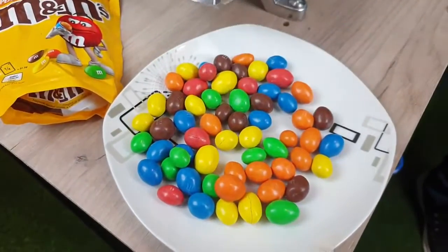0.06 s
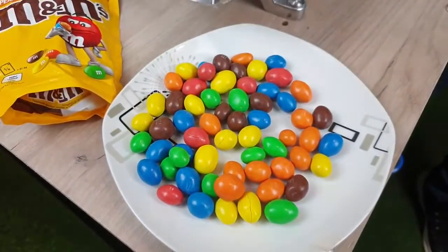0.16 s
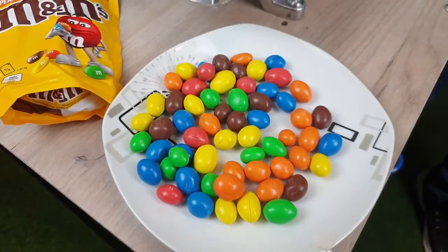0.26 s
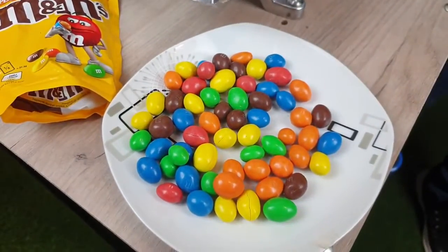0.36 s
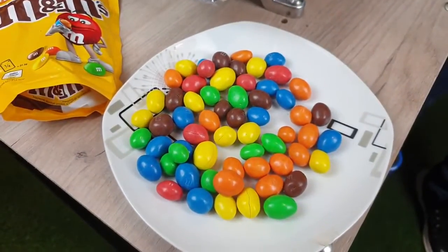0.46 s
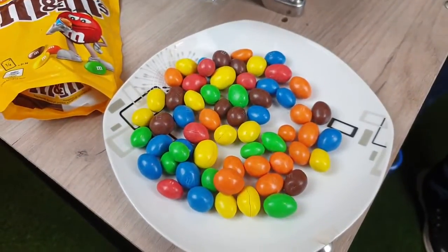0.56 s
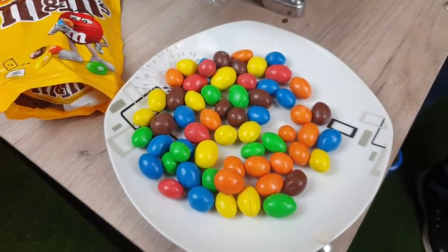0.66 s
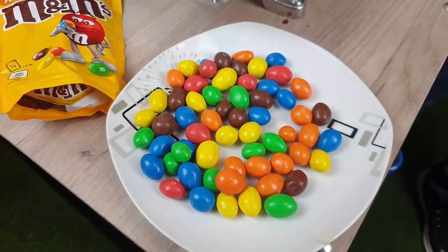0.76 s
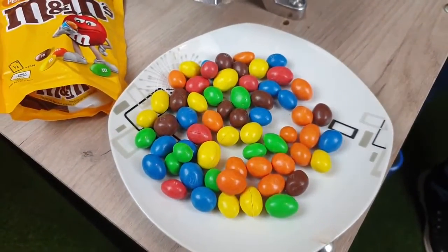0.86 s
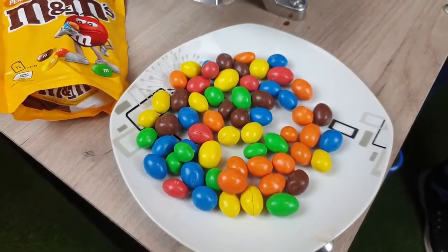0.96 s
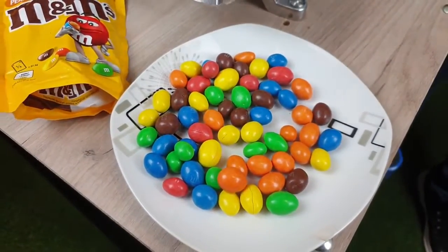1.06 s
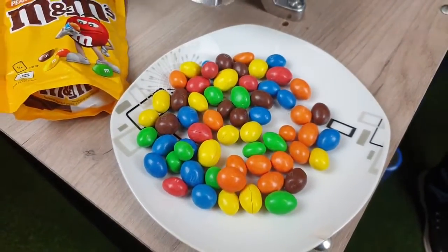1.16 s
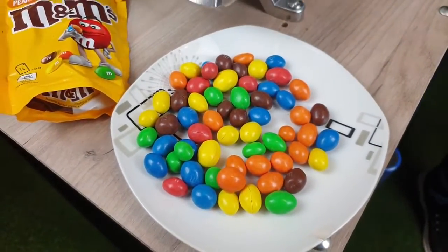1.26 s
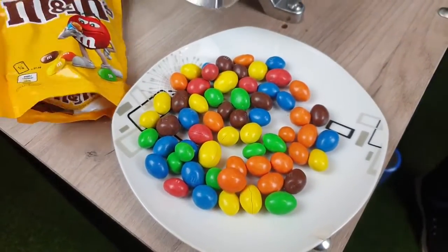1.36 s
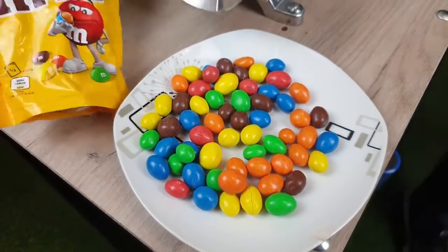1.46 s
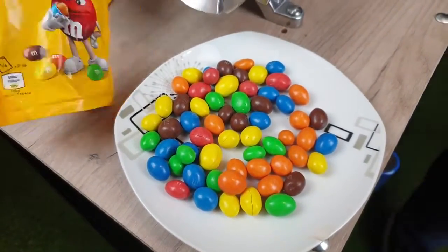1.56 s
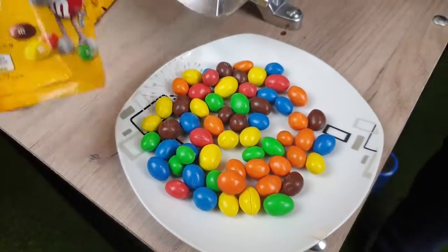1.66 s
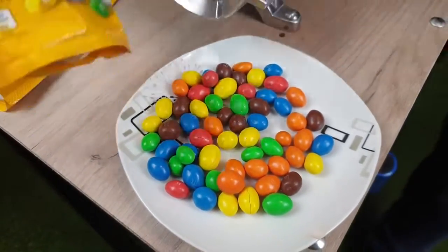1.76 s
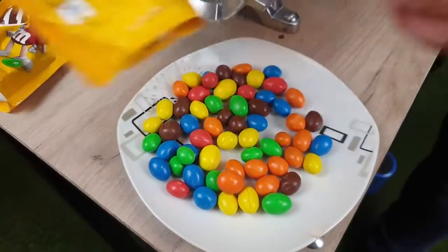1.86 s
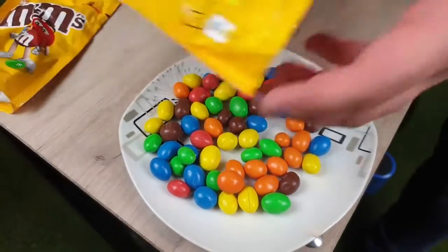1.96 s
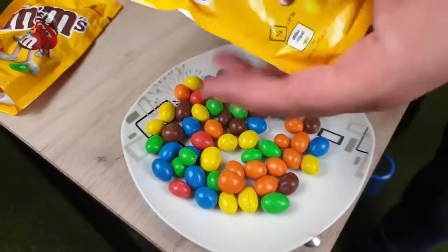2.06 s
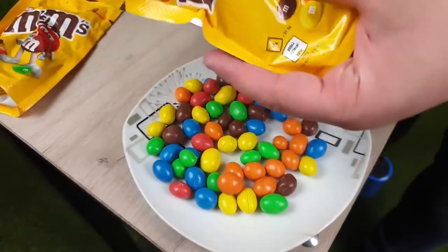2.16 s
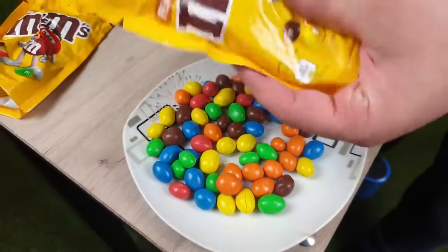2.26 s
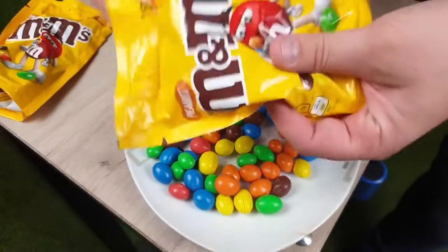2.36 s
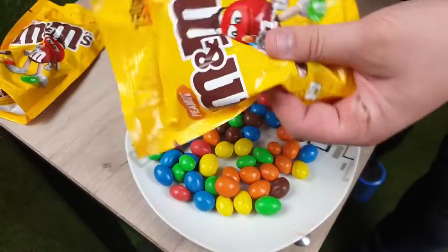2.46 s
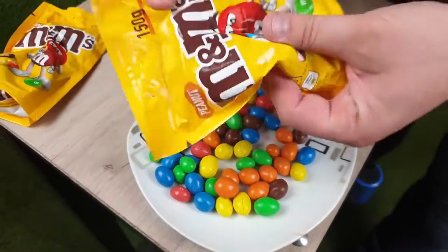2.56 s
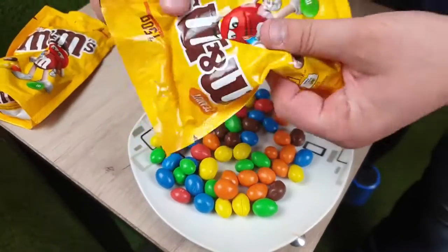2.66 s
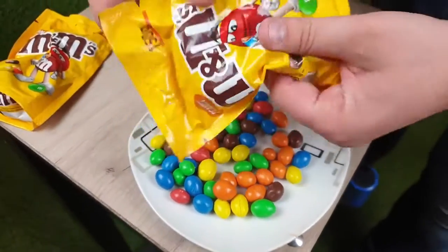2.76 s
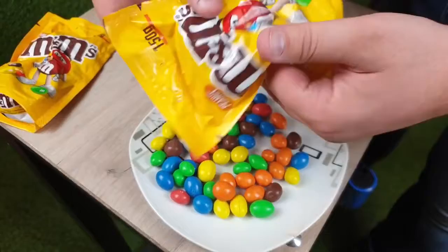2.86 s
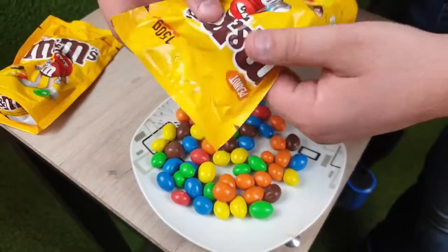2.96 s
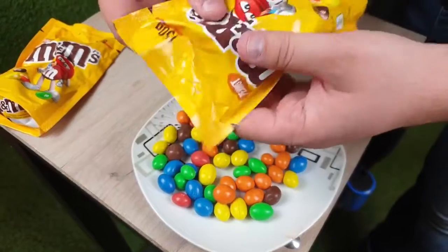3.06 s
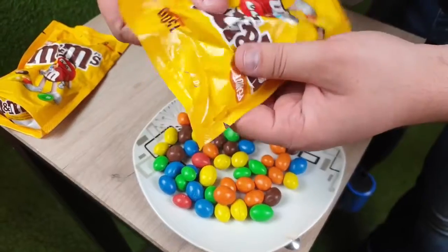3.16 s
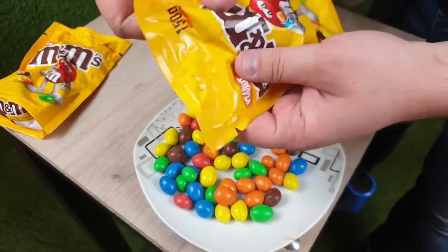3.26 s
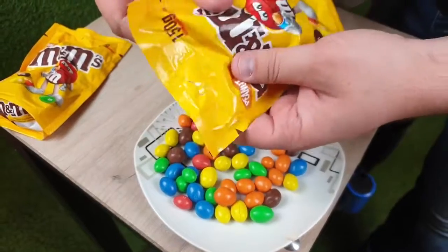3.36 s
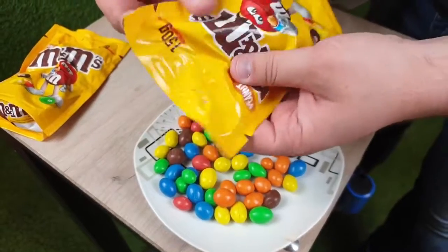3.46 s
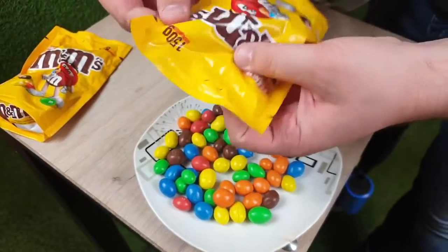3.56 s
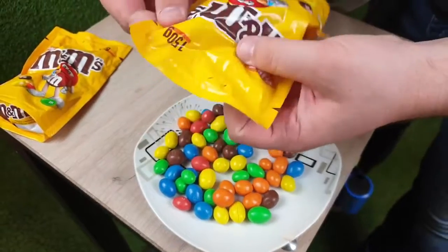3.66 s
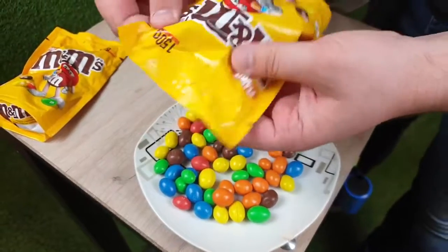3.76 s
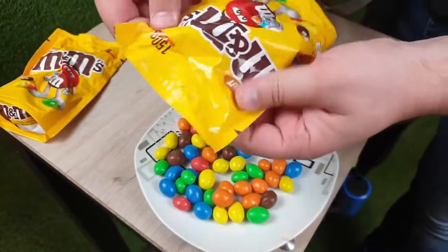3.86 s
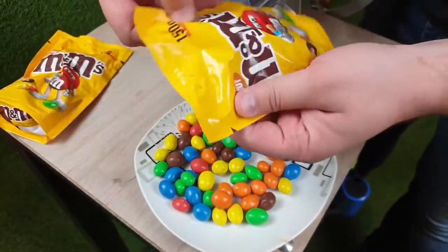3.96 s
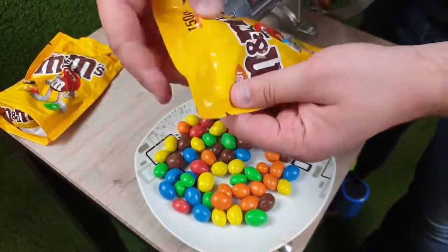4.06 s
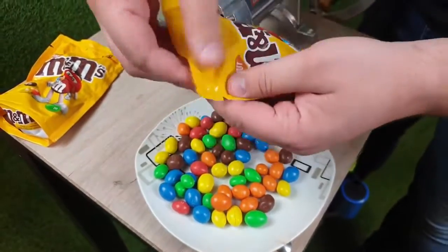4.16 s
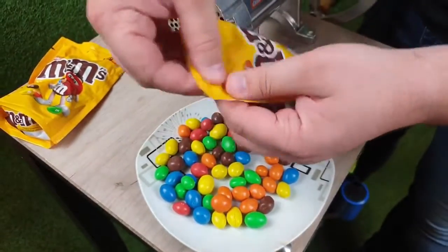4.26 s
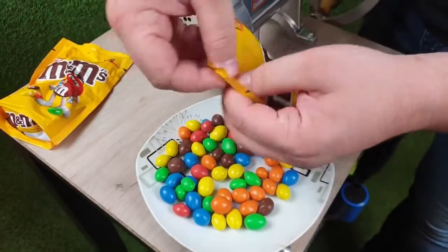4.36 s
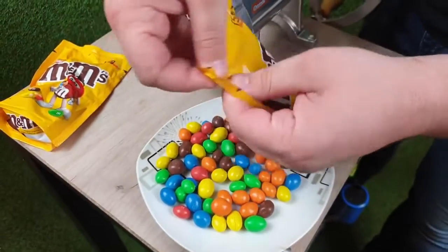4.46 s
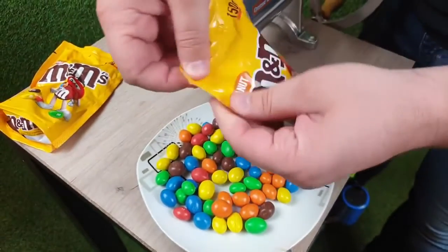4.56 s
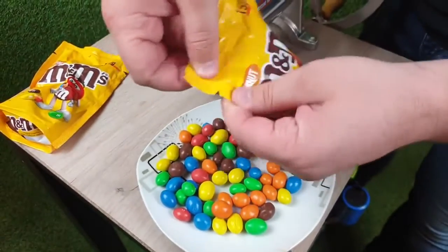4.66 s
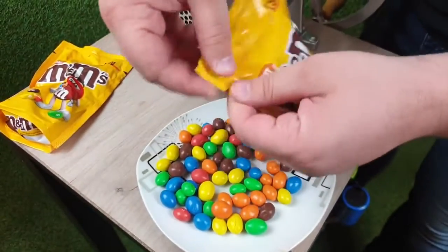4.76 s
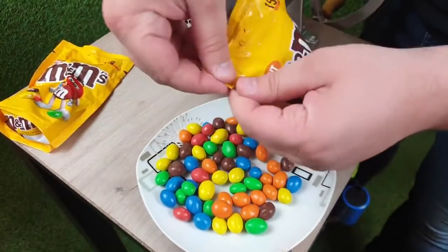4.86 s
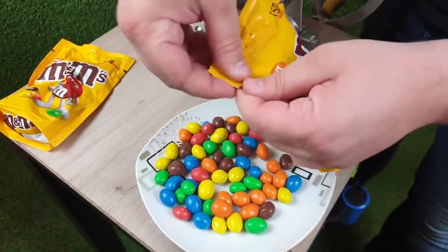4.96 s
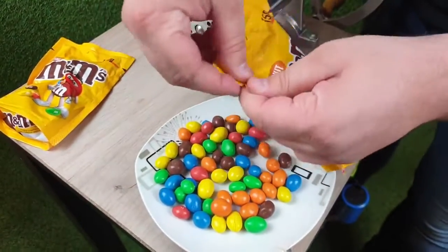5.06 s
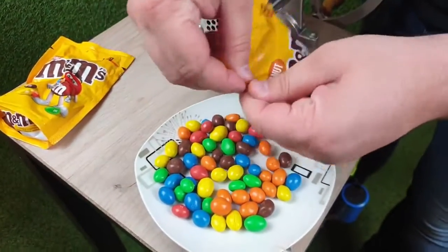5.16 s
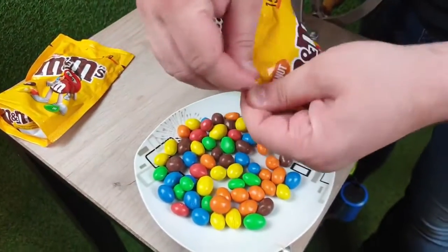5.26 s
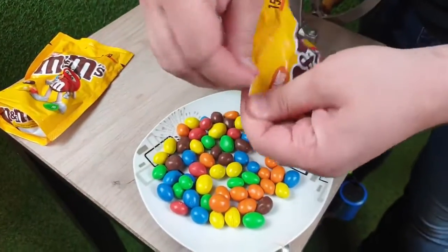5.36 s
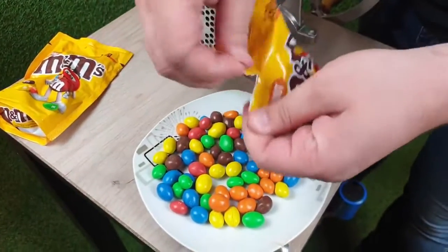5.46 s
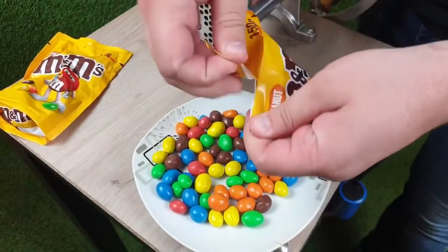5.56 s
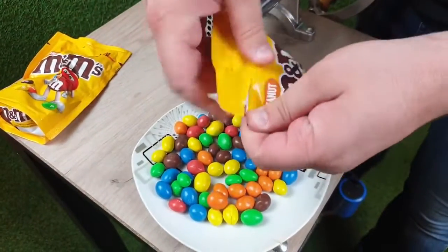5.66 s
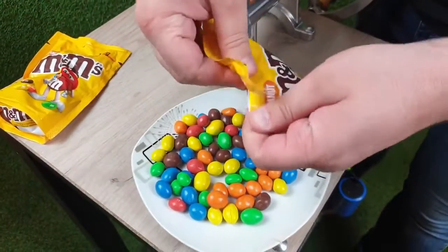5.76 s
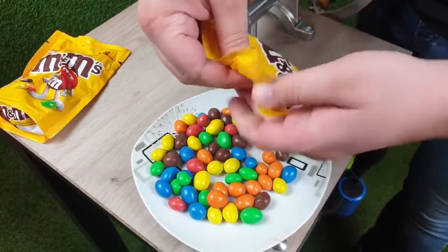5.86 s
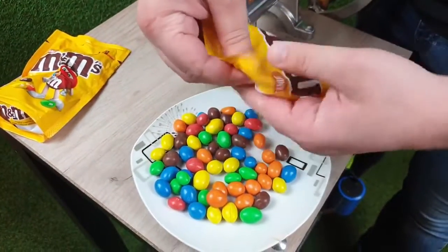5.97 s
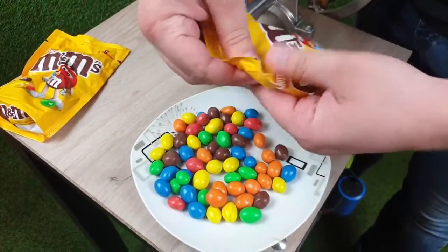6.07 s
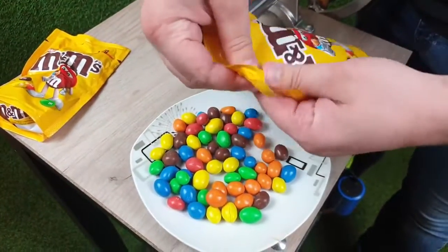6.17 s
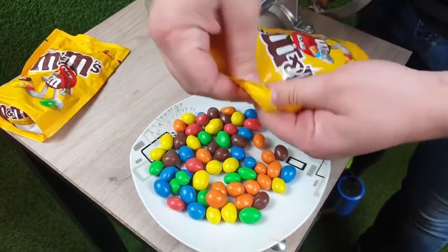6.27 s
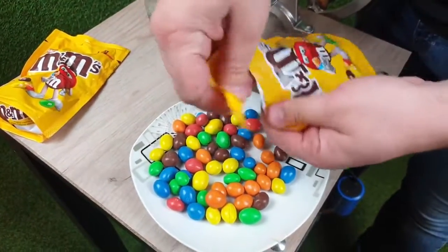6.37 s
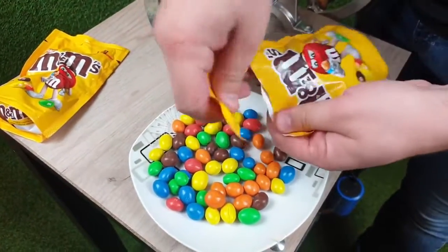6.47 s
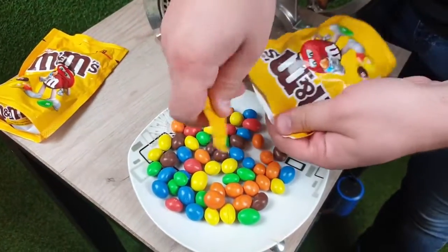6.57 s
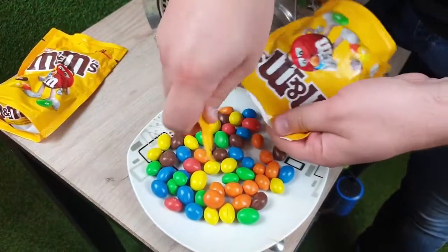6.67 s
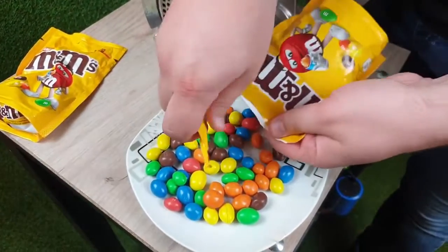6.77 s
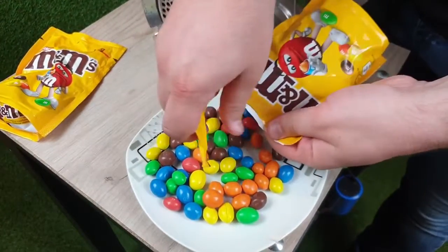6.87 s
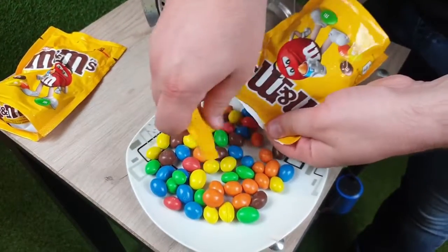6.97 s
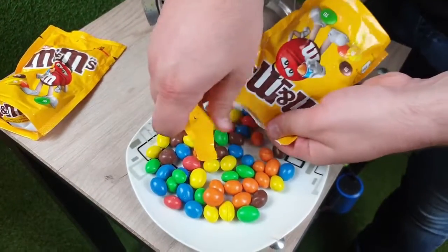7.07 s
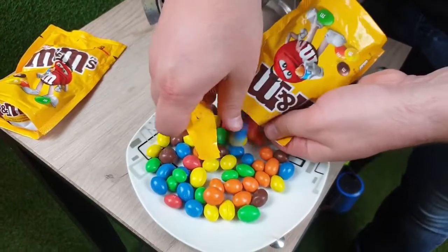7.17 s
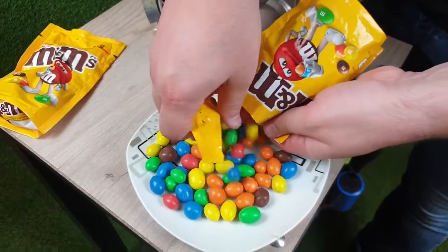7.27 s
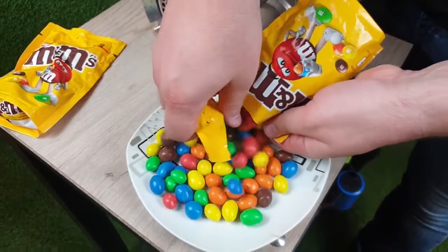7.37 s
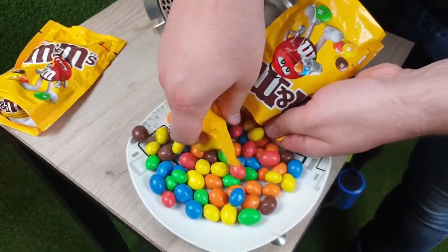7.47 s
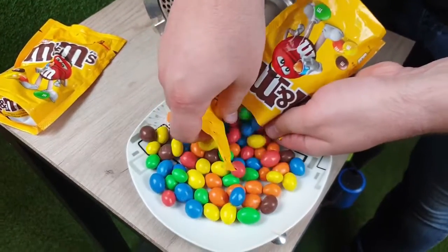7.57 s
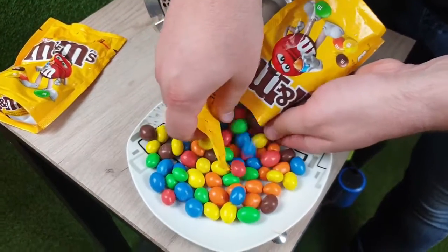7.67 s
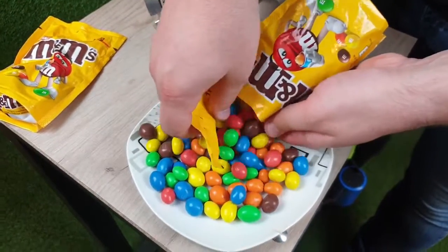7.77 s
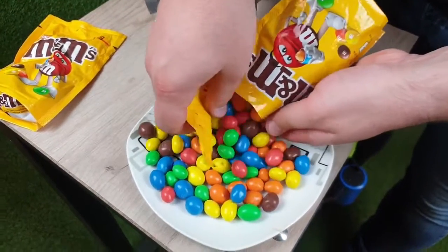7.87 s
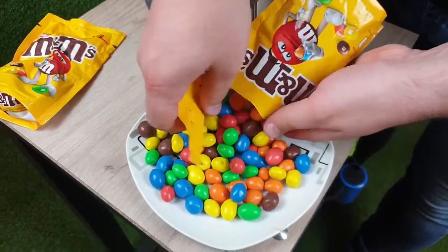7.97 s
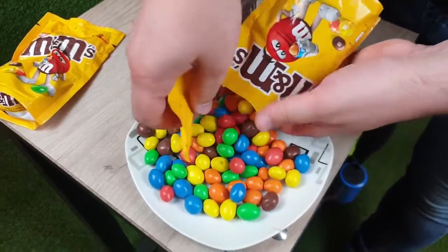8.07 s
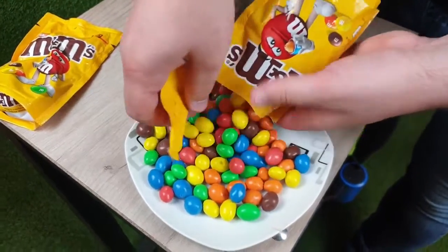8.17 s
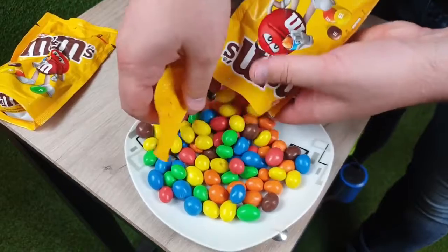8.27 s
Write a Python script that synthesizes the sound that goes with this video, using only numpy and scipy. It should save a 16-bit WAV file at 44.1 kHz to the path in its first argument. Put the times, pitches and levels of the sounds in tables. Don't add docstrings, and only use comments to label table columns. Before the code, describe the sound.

In a quiet room with a faint far motor hum, a plastic bag barely shifts, then is lifted with loud, sharp crinkling while candies knock dully inside. It is turned over and torn with uneven crackles. A short, dense pour of hard candies clicks and rings on a china plate, thinning quickly to soft film rustle. Close stereo microphone, sources slightly left, little reverberation.

```python
import sys
import numpy as np
from scipy import signal
from scipy.fft import rfft, irfft, next_fast_len
from scipy.io import wavfile
from scipy.ndimage import uniform_filter1d, map_coordinates

SR = 44100
rng = np.random.default_rng(int(sys.argv[2]) if len(sys.argv) > 2 else 0)


def invert_db(level):
    return 10 ** (np.asarray(level, dtype=float) / 20)


def put_to_file(sound):
    columns = np.atleast_2d(sound).T
    safe = np.clip(columns, -1, 1)
    whole_steps = np.round(safe * 32767)
    wavfile.write(sys.argv[1], SR, whole_steps.astype(np.int16))


N = 366471
LIFT_S = 1.33
TABLE_SIDE = invert_db([[2.5], [-2.5]])


def along(points, hz):
    f, v = np.transpose(points)
    return np.interp(np.log(hz + 1), np.log(f + 1), v)


def curve(rows, col=1, at=None):
    rows = np.asarray(rows)
    times = np.arange(N) / SR if at is None else at
    return np.interp(times, rows[:, 0], rows[:, col], -140, -140)


def wobble(rate):
    knots = rng.standard_normal(int(N * rate / SR) + 4)
    return map_coordinates(knots, [np.arange(N) * rate / SR])


def filtered(x, response):
    m = next_fast_len(N + SR // 2)
    return irfft(rfft(x, m) * response(np.fft.rfftfreq(m, 1 / SR)), m)[..., :N]


def hiss(spectrum, alike=0):
    a, b = rng.standard_normal((2, N))
    right = alike * np.roll(a, 4) + np.sqrt(1 - alike ** 2) * b
    x = filtered(np.array([a, right]), lambda hz: invert_db(along(spectrum, hz)))
    return x / x.std()


def swells(rows, col, roundness):
    rows, t = np.asarray(rows), np.arange(0, N + 64, 64) / SR
    late = t - rows[:, :1]
    away = np.abs(late) / np.where(late < 0, rows[:, -2:-1], rows[:, -1:])
    level_db = rows[:, [col]] - 20 * away ** roundness
    return np.interp(np.arange(N) / SR, t, level_db.max(0).clip(-140))


def bursts(s, db, low_db, high_db, life, spectrum, ripple_db, spread, size=1024, hollow_db=0):
    lead = .002
    t, hz = np.arange(size) / SR - lead, np.fft.rfftfreq(size, 1 / SR)
    chance = rng.standard_normal((len(s), 3)).clip(-2, 2)
    late = t.clip(0) / (life * invert_db(2 * chance[:, :1]))
    decay = (invert_db(-60 * late) + 1.2 * invert_db(-300 * late)) * (1 - np.exp(-late / 0.029))
    ripple = uniform_filter1d(rng.standard_normal((len(s), len(hz))), 16, axis=1) * 4
    low, high = 1 / (1 + (hz / 2200) ** 4), 1 / (1 + (8000 / (hz + 1)) ** 6)
    colour = along(spectrum, hz) + ripple_db * ripple + np.outer(high_db, high)
    pocket_hz = 930 * invert_db(1.95 * chance[:, 1:2])
    colour += hollow_db / (1 + ((hz - pocket_hz) / 220) ** 2)
    wave = rfft(decay * rng.standard_normal(decay.shape)) * invert_db(colour)
    rms = np.sqrt(np.mean(np.abs(wave) ** 2, 1))
    wave *= (invert_db(db) / rms)[:, None] * invert_db(np.outer(low_db, low))
    lag = 9e-5 + spread * chance[:, 1:2]
    pair = [wave * invert_db(1.12 * chance[:, 2:]), wave * np.exp(-2j * np.pi * hz * lag)]
    start = np.round((s - lead) * SR).astype(int)
    at = (start[:, None] + np.arange(size)).clip(0, N).ravel()
    return np.array([np.bincount(at, irfft(w).ravel(), N + 1)[:N] for w in pair])


def swarm(t0, t1, count, steep_db):
    u = rng.random((count, 2))
    return t0 + (t1 - t0) * u[:, 0], -steep_db * np.log(u[:, 1] + .01)


# (time [s], hum level [dB], rise [s], fall [s])
MOTOR_SWELLS = [
    (.12, -61, 0.18, 0.15),
    (.57, -59, 0.26, .27),
    (1.3, -52.5, 0.49, 0.47),
    (1.72, -60, 0.1, .4),
    (2.24, -54, 0.56, 0.17),
]
# (frequency [Hz], level [dB per Hz])
AIR_SPECTRUM = [(25, -38), (89, -12), (108, -31), (416, -36), (2910, -40), (4800, -39), (6600, -39.5),
                (11000, -43), (16000, -63)]


def background():
    motor_hz = 66.6
    phase = 2 * np.pi * motor_hz * np.arange(N) / SR + 1.2 * wobble(9)
    hum = invert_db(swells(MOTOR_SWELLS, 1, roundness=2.4) + 1) * np.sin(phase) * TABLE_SIDE
    air = [(hz, db - 25 * (hz < 110)) for hz, db in AIR_SPECTRUM]
    return hum + invert_db(-73.5 + 1.3 * wobble(1.9)) * hiss(air)


# (frequency [Hz], time to fall 60 dB [s])
ROOM_DECAY = [(300, .2), (2000, .14), (12000, .07)]


def room(x):
    hz, t, z = signal.stft(rng.standard_normal((2, SR // 3)), SR, nperseg=256)
    dying = z * invert_db(-60 * t / along(ROOM_DECAY, hz)[:, None])
    tail = signal.istft(dying, SR, nperseg=256)[1]
    later = np.pad(x, ((0, 0), (130, 0)))
    return signal.fftconvolve(later, tail / np.linalg.norm(tail[0]), axes=1)[:, :N]


# (time [s], crinkle level [dB], rattle level [dB], rise [s], fall [s])
SHIFTS = [
    (0, -58, -71, 0.14, 0.18),
    (.245, -71, -66, 0.019, 0.26),
    (.62, -54.5, -54, 0.045, 0.2),
    (1.28, -54.5, -61, 0.017, 0.93),
]
LIFT_GRIPS = [(1.388, -34.5, -41, 0.053, 0.077), (1.695, -26.5, -28.5, 0.15, 0.099),
              (1.82, -38.5, -34.5, 0.041, 0.25), (1.928, -29.5, -45, 0.03, 0.033),
              (2.184, -26, -24, 0.085, 0.22), (2.392, -15.5, -20.5, 0.087, 0.14),
              (2.597, -29, -30, 0.15, 0.34), (2.843, -53, -36, 0.51, 0.039), (3.044, -25, -29, 0.13, 0.22),
              (3.277, -27, -30.5, 0.15, 0.24), (3.4, -19, -41, 0.074, 0.042), (3.51, -38, -53, 0.12, 0.04),
              (3.699, -27, -30, 0.095, 0.062), (3.799, -34.5, -34, 0.078, 0.11),
              (4.109, -35.5, -35, 0.3, 0.097)]
TEAR_GRIPS = [(4.36, -39, -43, 0.16, 0.18), (4.451, -29, -41, 0.083, 0.57), (4.6, -34, -50, 0.2, 0.43),
              (4.77, -44.5, -42, 1, 0.16), (4.96, -43, -38, 0.25, 0.088), (5.219, -73, -48.5, 0.21, 0.47),
              (5.534, -32.5, -34, 0.21, 0.4), (5.854, -34.5, -33.5, 0.27, 0.48),
              (6.105, -31.5, -35.5, 0.091, 0.06), (6.392, -28, -50.5, .015, 0.28),
              (6.488, -23.5, -26.5, 0.13, 0.057), (6.8, -39, -40.5, 0.79, 0.31),
              (7.101, -44, -47.5, 0.093, 1.5), (7.27, -29, -38.5, 0.058, 0.36),
              (7.96, -42, -73, 0.062, 0.14), (8.091, -47, -68, 0.062, 0.04), (8.18, -46, -51, 0.048, 3.9)]
# (time [s], peak level [dB], knock level [dB])
LIFT_SNAPS = [(1.3585, -22.5, -9), (1.387, -15, -23.5), (1.4712, -15, -8), (1.5549, -17.5, -6),
              (1.6309, -8.5, -12), (1.666, -13, -3), (1.69, -9.5, 1.5), (1.752, -16, -3),
              (1.798, -15.5, -9), (1.8138, -10, -4), (1.9044, -20, 0), (1.936, -24, 1), (2.0162, -10, -17),
              (2.0203, -17, -6), (2.1023, -14, -16), (2.164, -7.5, -17), (2.227, -10, 0.5),
              (2.251, -11, 2.5), (2.3142, -9.5, -32), (2.3487, -6, -4.5), (2.373, -10, -11), (2.412, -9, 0),
              (2.4496, -11, -5), (2.778, -18.5, -7), (2.794, -11, -42), (2.8472, -14.5, -22),
              (2.9087, -13.5, -8.5)]
TURN_SNAPS = [(2.99, -12.5, -9), (3.034, -2.5, -13), (3.0793, -14, 0), (3.2046, -16, -34),
              (3.2802, -5, -18.5), (3.3664, -11.5, -22), (3.3907, -10, -1.5), (3.4119, -10.5, -8.5),
              (3.508, -41, -4.5), (3.574, -16, -14), (3.6277, -17, -10), (3.7668, -13, -10),
              (3.877, -25, -3.5), (3.8997, -26, -4), (3.921, -16, -12), (3.9853, -16, -6),
              (4.022, -16.5, -21), (4.084, -12, -4), (4.1198, -15.5, -2.5), (4.214, -20.5, -18),
              (4.2983, -15.5, -8), (4.3137, -10.5, -21.5), (4.4935, -10, -12.5), (4.7633, -9.5, -14),
              (4.817, -15.5, -11.5)]
# (time [s], peak level [dB], knock level [dB], edge level [dB])
TEAR_SNAPS = [(4.913, -19.5, -9, 7), (4.957, -22.5, -1, 4), (5.0554, -15.5, -23, -7), (5.299, -18, -13, 8),
              (5.3738, -19.5, -1.5, 5.5), (5.4076, -14.5, -4.5, -5), (5.4338, -9.5, -41, 5.5),
              (5.4936, -16.5, 0, 7), (5.5269, -9.5, -25, -1), (5.7045, -15.5, -3.5, -4),
              (5.7689, -8.5, -3, 5), (5.8058, -19, -8, 3), (5.863, -12, -1.5, -6),
              (5.9238, -9.5, -17.5, -3), (6.2229, -18.5, -9, -6), (6.283, -27, -0.5, -8),
              (6.3174, -10.5, -3.5, -4), (6.3871, -14.5, -12, -12), (6.544, -6, -18.5, 3.5),
              (6.5994, -19, -1.5, 3), (6.6375, -21, -8, 8), (6.7992, -10.5, -2.5, 7.5),
              (6.9231, -22, -2, -12), (6.992, -26, -8, 0), (7.05, -10, -10.5, -8.5),
              (7.2411, -13, -8.5, -8.5)]
# (time [s], level [dB])
POUR = [
    (7.325, -12.5),
    (7.413, -11),
    (7.521, -16),
    (7.592, -14.5),
    (7.691, -24.5),
    (7.775, -20.5),
    (7.865, -26),
    (7.924, -30.5),
    (7.97, -39),
]


def hands(col):
    pour_db = curve(POUR)
    still_db = [-28.5, -41][col - 1]
    shake_db = np.where(pour_db > -100, 0.45 * pour_db + still_db, -140)
    after = [(s + .005, db - 26, db + knock_db - 15, .005, 0.04)
             for s, db, knock_db, *_ in LIFT_SNAPS + TURN_SNAPS + TEAR_SNAPS]
    return np.maximum(swells(SHIFTS + LIFT_GRIPS + TEAR_GRIPS + after, col, roundness=1), shake_db)


# (time [s], peak level [dB], frequency [Hz])
BUMPS = [(3.027, -47.5, 63.6), (3.563, -54, 132), (3.965, -55, 89), (4.039, -56, 124), (4.892, -53, 121),
         (5.17, -54.5, 115), (5.347, -57, 114), (5.6, -53, 163), (5.763, -40.5, 90), (6.916, -52, 106),
         (7.305, -46, 97)]


def table():
    out, t = np.zeros((2, N + SR)), np.arange(SR // 5) / SR
    sag = 0.31 * 0.018 * (1 - np.exp(-t / 0.018))
    for s, db, hz in BUMPS:
        thud = np.sin(2 * np.pi * hz * (t + sag)) * invert_db(db + 8.0 - 60 * t / 0.11)
        thud *= 1 - np.exp(-t / 0.0025)
        board = np.sin(2 * np.pi * hz * 2.38 * t) * invert_db(db + 2.5 - 60 * t / 0.034)
        bump = thud + board
        pair = [bump, np.roll(bump, round(rng.normal(0, 0.0015) * SR))]
        out[:, round(s * SR):][:, :len(t)] += pair * TABLE_SIDE
    force_db = np.maximum(hands(col=2), curve(POUR) - 11.5).clip(-68)
    resting = np.arange(N) < LIFT_S * SR
    lumps = invert_db(0.76 * force_db - 36.5 + 3.2 * resting + 3.6 * wobble(7.1))
    rumble = hiss([(20, -9.0), (60, 1.0), (200, -1.0), (400, -6.0), (900, -58)], 0.55)
    return out[:, :N] + lumps * rumble * TABLE_SIDE


# (time [s], peak level [dB], brightness [dB])
DROPS = [(7.3166, 1.5, -7), (7.3283, -2, 3), (7.349, -5, -4), (7.358, -3, 3.5), (7.39, -4.5, -6),
         (7.4034, -8, 6), (7.4213, 2.5, -10), (7.431, -3.5, 0.5), (7.452, -9, -3), (7.462, -8.5, 0),
         (7.4744, 0.5, -1), (7.4824, -4, -3), (7.494, -4, -11), (7.5285, -1, 0), (7.5443, 2.5, -8),
         (7.56, -14, -4), (7.578, 3.5, -10.5), (7.5842, 2.5, -6), (7.614, -1, -8.5), (7.636, -8, -8),
         (7.646, -6.5, -6.5), (7.665, -13.5, -19), (7.674, -11.5, -2.5), (7.6906, -7, -14),
         (7.7072, -11, -31), (7.7214, -8, -8), (7.7423, -10.5, -18), (7.7588, -8.5, -7), (7.769, -7.5, -8),
         (7.775, -5.5, -10), (7.787, -6, -8), (7.81, -14, -11), (7.8236, -7, 1.5), (7.8357, -9.5, -16),
         (7.8473, -5.5, -5), (7.9128, -4, -9.5), (7.9163, -10, -3.5)]
# (frequency [Hz], level [dB per Hz])
SHELL = [(200, -39.5), (1510, -39), (3940, -13), (4720, -15.5), (5450, -7.5), (6190, -23), (9380, -24),
         (15000, -61)]
# (frequency [Hz], width [Hz], level [dB])
PLATE_MODES = [(467, 5.8, -27.5), (668, 18, -25.5),
               (1878, 37, -16.5), (2150, 58, -10.5), (2400, 21, -17), (2844, 19, -12), (3170, 34, -16),
         (3542, 126, -7.5), (3994, 88, -13.5), (5200, 68, -1.5), (5483, 99, 0), (5570, 42, -13.5),
         (7010, 48, -0.5), (7820, 43, -12.5), (8450, 37, -25), (9190, 45, -7.5), (9400, 27, -8),
         (9650, 30, -11), (10200, 19, -17), (10460, 112, -26), (12090, 38, -15.5), (12600, 82, -18),
         (14100, 44, -34), (15300, 54, -24)]
# (frequency [Hz], left minus right [dB])
PLATE_LEAN = [(660, -4), (2130, 8), (3520, -11), (4000, 13), (5450, -1.5), (7050, 6.5), (7820, -4),
              (9330, 7), (12600, -1)]


def candies():
    s, db, bright_db = np.transpose(DROPS)
    roll_s, roll_db = swarm(POUR[0][0], POUR[-1][0], count=330, steep_db=3.0)
    s, db = np.r_[s, roll_s], np.r_[db, roll_db + curve(POUR, 1, roll_s) - 1]
    bright_db = np.r_[bright_db + 6, 0 * roll_s - 1.5]
    landed = np.arange(len(s)) < len(DROPS)
    clicks = bursts(s, db + 8.0 - 5 * landed, 0 * s - 6, bright_db - 19, 0.016, SHELL,
                    ripple_db=-0.5, spread=6e-5)

    piled_s, piled_hz = 7.63, 6500
    alike = 0.46
    first = int(s.min() * SR)
    ring, at = np.zeros((2, N - first)), (s * SR).astype(int) - first
    for hz, width, mode_db in PLATE_MODES:
        lean_db = along(PLATE_LEAN, hz) / 2
        loss = np.pi * .8 * min(width, 55) / SR
        heaped_loss = loss * (1.93 if hz < piled_hz else 1.9)
        rise = 1.012 if hz < piled_hz * 1.25 else 1
        for side in (-1, 0, 1):
            bare_w = 2 * np.pi * (hz + .45 * side * width) / SR
            strike_db = db + mode_db - 23.5 + bright_db * (hz > 6500) + 5.8 * (hz > 13000)
            strike_db = strike_db - 2 * abs(side) * (width < 50)
            strength = rng.choice([-1, 1], len(s)) * invert_db(3.73 * rng.standard_normal(len(s)))
            strength *= invert_db(strike_db) * np.sqrt(width / 40)
            other = strength * (alike + np.sqrt(1 - alike ** 2) * rng.standard_normal(len(s)))
            bare = (s < piled_s, np.exp(-loss), bare_w)
            heaped = (s >= piled_s, np.exp(-heaped_loss), bare_w * rise)
            for part, r, w in (bare, heaped):
                blows = [np.bincount(at, v * part, N - first) for v in (strength, other)]
                mode = signal.lfilter([0, np.sin(w)], [1, -2 * r * np.cos(w), r * r], blows)
                ring[0] += mode[0] * invert_db(lean_db)
                ring[1] += np.roll(mode[1], round(np.pi / 2 / w)) * invert_db(-lean_db)
    ring = np.pad(ring, ((0, 0), (first, 0)))
    return clicks + filtered(ring, lambda hz: 1 / (1 + (420 / (hz + 1)) ** 6))


# (time [s], peak level [dB], knock level [dB])
FIRST_SNAPS = [
    (0.041, -49, 5),
    (0.5858, -50, -2),
    (1.28, -44, -46),
]
LAST_SNAPS = [
    (7.971, -23.5, -39),
    (8.001, -22.5, -23),
    (8.064, -22.5, -28),
    (8.1578, -23.5, -21),
    (8.1843, -13.5, -70),
    (8.247, -22.5, -57),
    (8.275, -23.5, -64.5),
    (8.2921, -19, -51),
]
# (time [s], peak level [dB], knock level [dB], edge
# level [dB])
CREASES = [(1.407, -28.5, -0.5, -3), (1.4615, -29.5, -4, -7), (1.49, -29, -4, -6),
           (1.6346, -8, -11.5, -5), (1.917, -27, -9, -7), (2.04, -19.5, -8, -9),
           (2.112, -17.5, -14, -16), (2.1554, -30, -17, -16.0), (2.171, -20, -10, -11),
           (2.1865, -13, -9.5, -1), (2.2748, -11, -13, -3), (2.467, -18, -8, -9),
           (2.5384, -23.5, 2, -11), (2.581, -18, -12, 3), (2.6056, -9.5, -16, -2),
           (2.673, -17, -14, 3.5), (2.7034, -14, -23, -22), (2.7168, -24.5, 3.5, -4),
           (2.8244, -19.5, -9.5, -3), (2.9545, -23, -16, 0), (3.0036, -17, -3, 2.0),
           (3.1524, -19, -6, -19), (3.1634, -21, -5, -10.0), (3.215, -16.5, -13, -15),
           (3.313, -17, -24, 2), (3.356, -26, -12.0, -5), (3.402, -15.5, -25, 4),
           (3.5176, -29, -17.0, -16), (3.666, -18, -8, 8), (3.6832, -21, -9.0, 13),
           (3.7288, -14.5, -12.5, 4), (3.81, -22.5, -6.5, 0), (3.9752, -24, -13, 6),
           (4.011, -16, -4.5, 8), (4.0284, -13.5, -6.5, 12.5), (4.2517, -31.5, -2, -35),
           (4.3388, -25, -6, -3), (4.372, -27.5, -20, 10), (4.447, -17, -8.0, 3),
           (4.525, -16, -36, -5),
           (4.535, -20, -22.0, -6.0), (4.639, -21.5, 2.5, 3), (4.671, -22, -12, -11),
                (4.751, -21, -22, 0), (4.8462, -25.5, -16, -11), (4.948, -23, -11, 0), (5.1684, -41, 1, -7),
                (5.302, -19.5, -7, 2), (5.4727, -19, -28, -6), (5.5114, -22.5, 1, -17),
                (5.547, -17, -8, -3), (5.61, -22, 3, 0.5), (5.629, -31, -17, -3.0),
                (5.6723, -19.5, -13, -3), (5.748, -22, -13, 23), (5.826, -16, -9, -1),
                (5.8538, -15.5, -6, -13), (5.9477, -17.5, -21, -3), (5.9884, -27.5, -5, -9.0),
                (5.9981, -22, -11, 3.5), (6.045, -19, -30, -9), (6.0625, -22.5, -22, -17),
                (6.1049, -19, 2, -4), (6.261, -29, -5, -5), (6.326, -30.5, -20, -9.0),
                (6.431, -21.5, -24, 10), (6.5023, -20, -22, -7.0), (6.7533, -26.5, -5.0, -15),
                (6.8862, -23, -6.5, -20), (7.039, -31, 0, 0), (7.086, -32, -6, -20),
                (7.098, -43, -13.0, -14.0), (7.121, -34, -8, -8), (8.017, -34.5, -12, -23),
                (8.078, -30, -24, -25), (8.086, -36, -16, -25), (8.1672, -37, -19, -16.0),
                (8.1784, -28, -19, -4), (8.217, -37, -16.0, 4), (8.2655, -28.5, -34, -2),
           (2.336, -22, -1, -12),
    (2.395, -17.5, -16, 8),
    (4.6, -26.5, -11, 6),
    (4.613, -43, -18, -3),
    (4.964, -25, -19, -3),
    (6.5398, -12.5, -14, 6),
    (6.645, -29, -13, 6),
    (6.688, -28.5, -4, -11),
]
# (time [s], peak level [dB])
TAPS = [(5.023, -36), (5.117, -34), (5.156, -48), (5.185, -35.5), (5.285, -29), (6.373, -24.5),
        (6.831, -24.5), (7.275, -27), (7.295, -37), (8.007, -36), (8.099, -39),
        (1.3811, -34.5), (1.5276, -39), (1.621, -27.5), (1.8957, -38), (2.287, -19), (2.3622, -16),
             (2.5763, -20), (2.8801, -34), (2.945, -29), (3.2631, -18), (3.3949, -24.5), (3.5025, -31),
             (3.8585, -28), (3.9485, -25.5), (4.4292, -23), (4.4624, -20), (4.5644, -24), (4.7261, -25.5),
             (4.7888, -29), (5.3676, -25), (5.4285, -35.5), (5.5723, -38), (5.6761, -27), (6.0745, -28),
             (6.0887, -28.5), (6.3622, -30), (7.2472, -23)]
# (frequency [Hz], level [dB per Hz])
FILM = [(88, -32), (150, -19), (454, -5.5), (491, -11.5), (950, -2), (2560, -3.5), (5360, -0.5), (6760, -6),
        (8220, -13), (11000, -12.5), (15600, -17.5)]
KNOCK = [(150, -30.5), (400, -15.5), (800, -4), (1500, -3), (2300, -10.5), (5000, -28.5)]


def bag():
    def flat_db(s):
        return -6 * (s < 2.15)[:, None]

    pour_start = POUR[0][0]
    s, db, knock_db = np.transpose(FIRST_SNAPS + LIFT_SNAPS + TURN_SNAPS + LAST_SNAPS)
    edge_db = 3 * rng.standard_normal(len(s)) - 22 * (s > pour_start)
    s, db, knock_db, edge_db = np.c_[[s, db, knock_db, edge_db], np.transpose(TEAR_SNAPS)]
    snaps = bursts(s, db + 15.0, knock_db + 3.0, edge_db + 4.5, 0.017, FILM,
                   ripple_db=2.8, spread=5e-5, hollow_db=flat_db(s))

    s, db, knock_db, edge_db = np.transpose(CREASES)
    snaps += bursts(s, db + 16.5, knock_db + 5, edge_db + 3.5, 0.017, FILM,
                    ripple_db=3.0, spread=7e-5, size=512, hollow_db=flat_db(s))

    rattle_db = hands(col=2)
    crinkle_db = hands(col=1) + 2 * wobble(60)
    s, size_db = swarm(LIFT_S, N / SR, count=3000, steep_db=3)
    edge_db = 4 * rng.standard_normal(len(s)) - 12 * (s > pour_start)
    tick_db = size_db + 1.145 * crinkle_db[(s * SR).astype(int) - 1] + 18.5
    ticks = bursts(s, tick_db, 0 * s - 8, edge_db, 0.012, FILM,
                   ripple_db=4, spread=0.000164, size=384, hollow_db=flat_db(s))

    s, size_db = swarm(LIFT_S, N / SR, count=1100, steep_db=3.0)
    small_db = size_db + rattle_db[(s * SR).astype(int) - 1] + 15 + flat_db(s)[:, 0] / 2
    tap_s, tap_db = np.transpose(TAPS)
    s, db = np.r_[tap_s, s], np.r_[tap_db + 16, small_db]
    knocks = bursts(s, db, 0 * s, 0 * s, 0.018, KNOCK,
                    ripple_db=4.0, spread=4e-5, hollow_db=6 + flat_db(s))

    resting = np.arange(N) / SR < LIFT_S
    dull = [(hz, db - 4 * (hz > 7500)) for hz, db in FILM]
    rustle = invert_db(crinkle_db - 7.5 + 2.2 * resting) * hiss(dull, 0.52)
    shuffle = hiss([(250, 4.5), (700, -5), (1600, 2.0), (2600, -20), (5000, -42)], 0.27)
    rustle += invert_db(rattle_db - 5.0) * resting * shuffle
    return snaps + ticks + knocks + rustle


# (frequency [Hz], left minus right [dB])
LEAN = [(60, 7), (150, 1.5), (600, 5.5), (2380, 3.5), (5980, 3.5), (15000, 6)]


def scene():
    near = bag() + candies()
    near = near + invert_db(-12) * room(near)
    near = filtered(near, lambda hz: invert_db(along(LEAN, hz) * [[.5], [-.5]]))
    return near + table() + background()


def top_cut(x):
    return signal.sosfilt(signal.butter(12, 16980, fs=SR, output="sos"), x)


def record(dry):
    x = dry / (1 + np.abs(dry) ** 8) ** (1 / 8)
    x = filtered(x, lambda hz: (hz < 16900) * invert_db(-22 * (hz > 15900)))
    return top_cut(x)


dry = scene()
out = record(dry)
put_to_file(out)
```